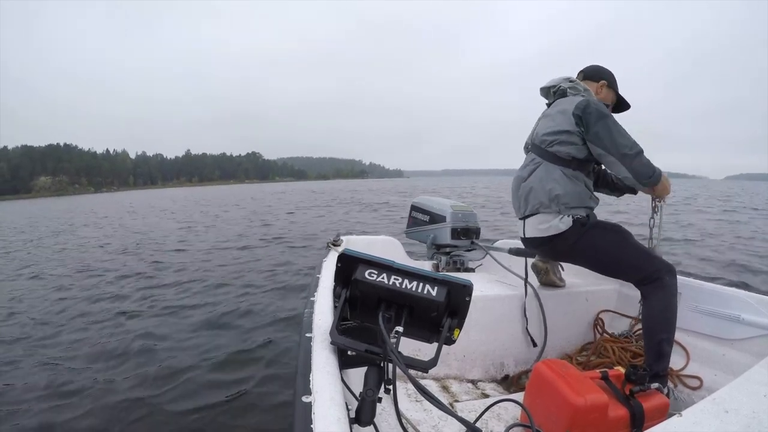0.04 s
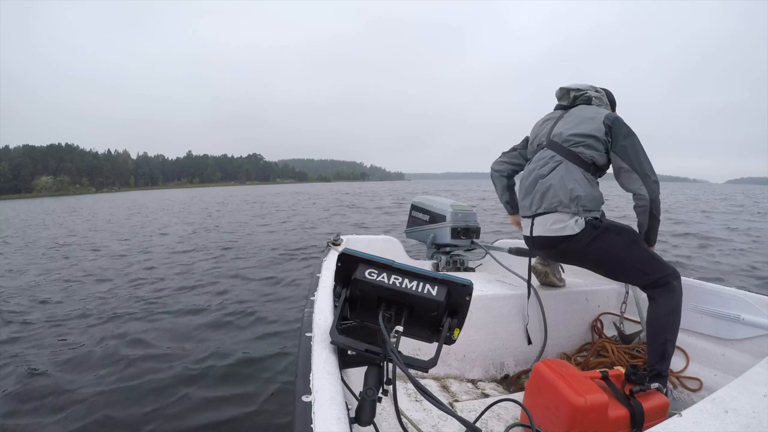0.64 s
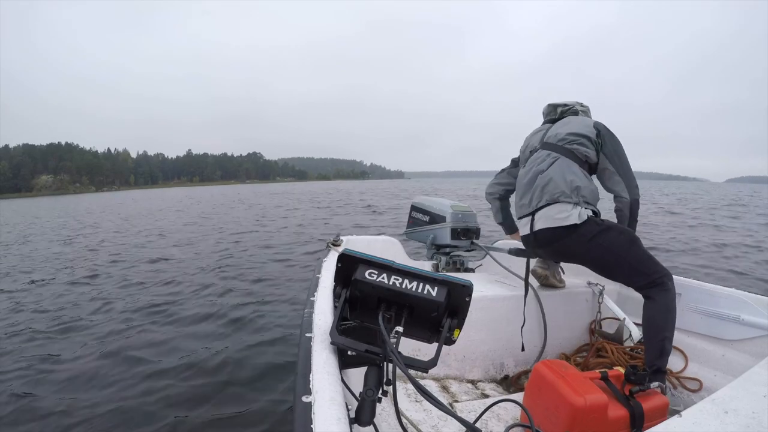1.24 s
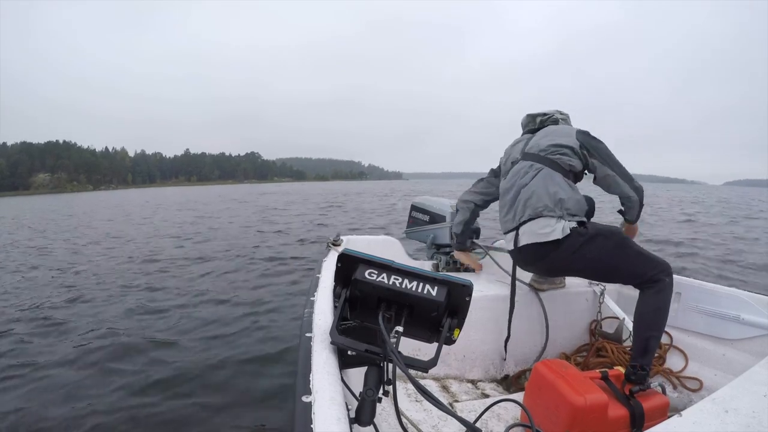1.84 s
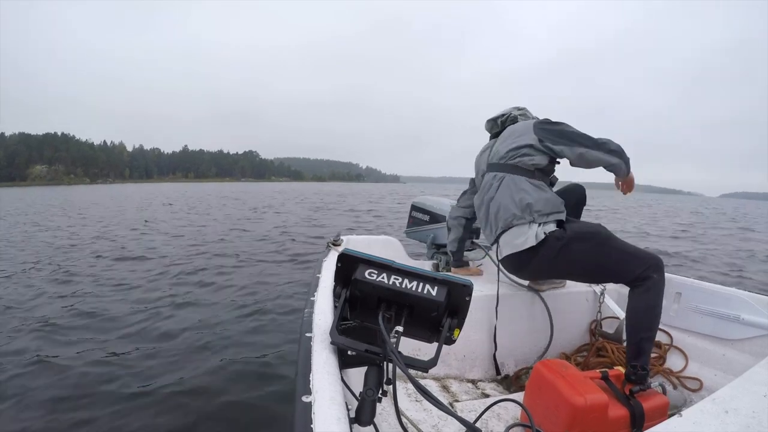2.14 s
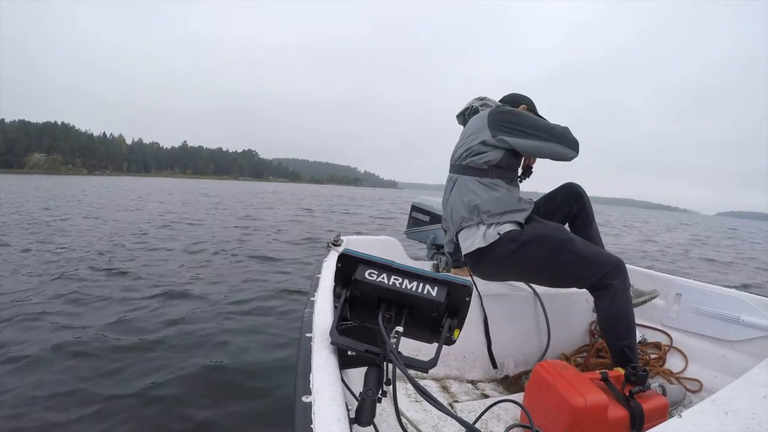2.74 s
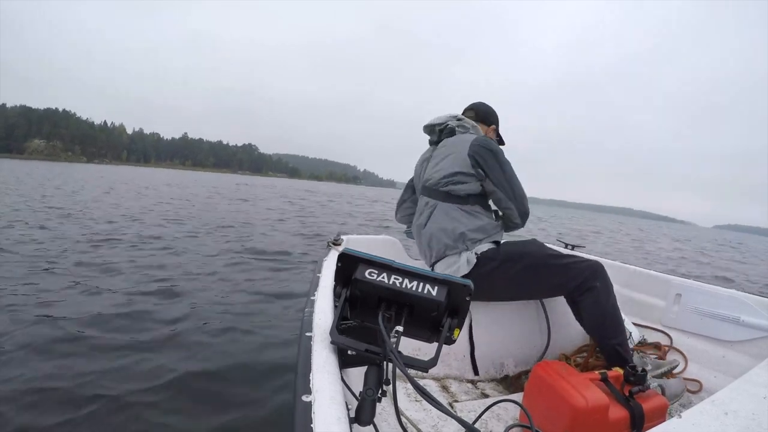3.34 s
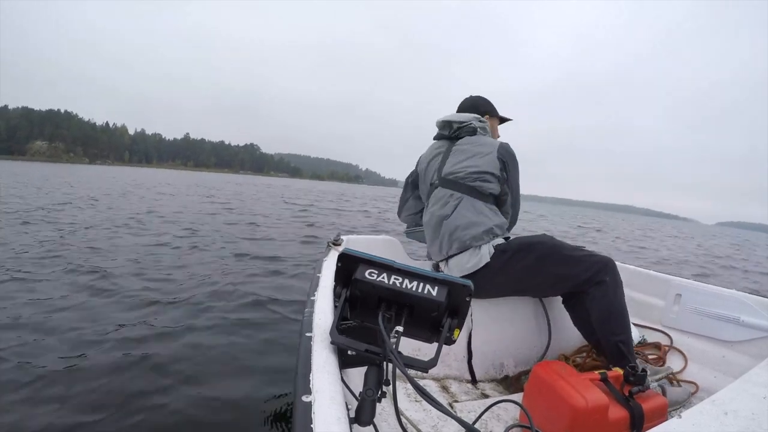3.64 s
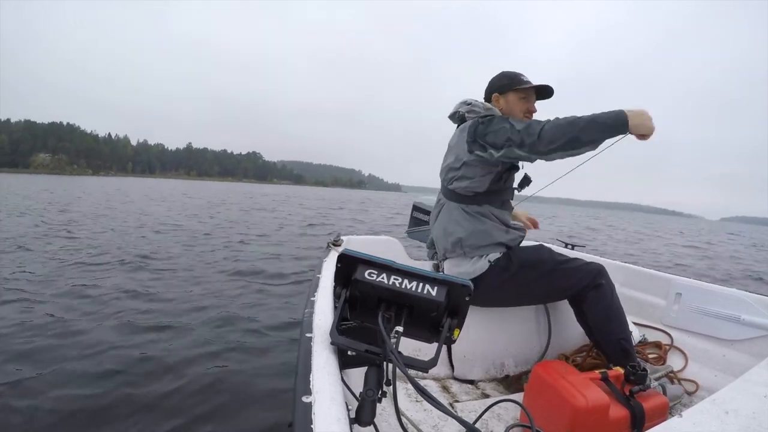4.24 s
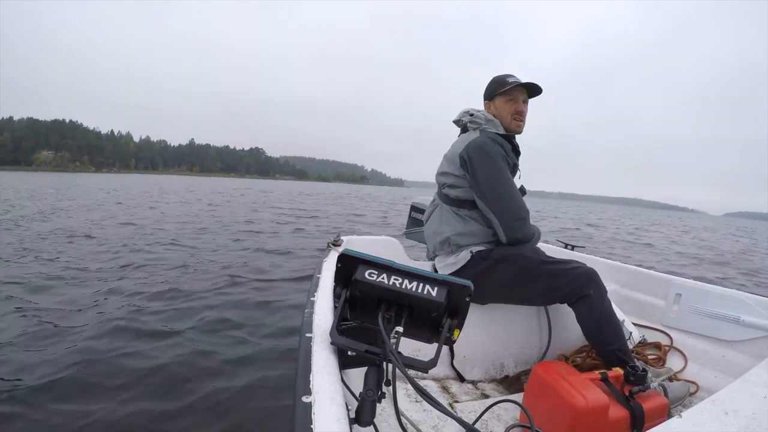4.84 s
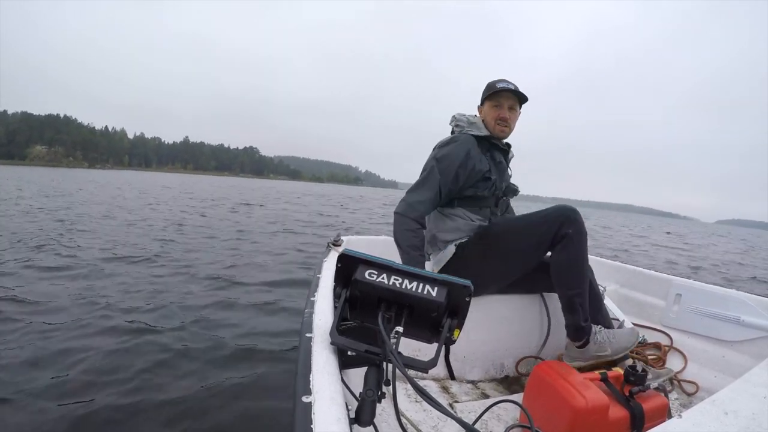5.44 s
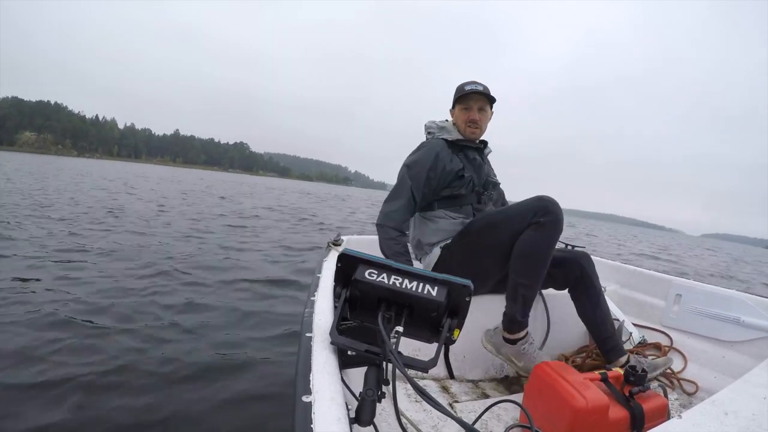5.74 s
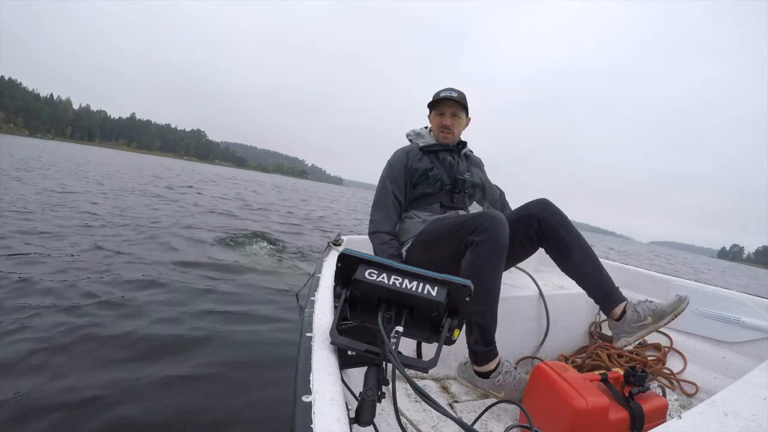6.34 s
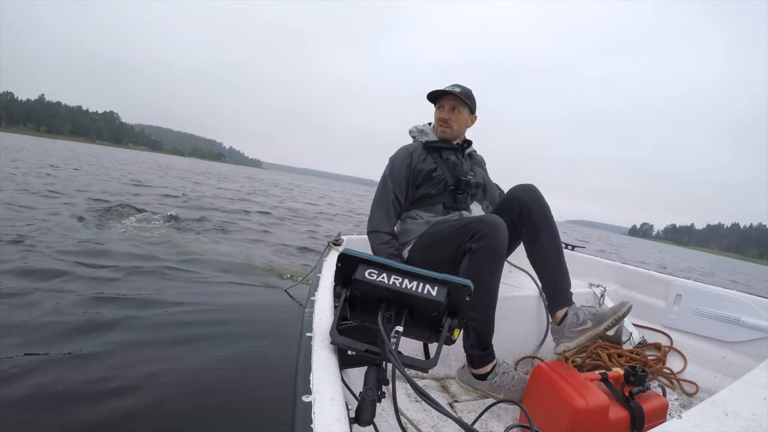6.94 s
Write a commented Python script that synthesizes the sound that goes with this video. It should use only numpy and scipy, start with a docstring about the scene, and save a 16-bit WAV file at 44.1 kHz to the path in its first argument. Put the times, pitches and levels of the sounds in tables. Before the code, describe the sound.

An anchor chain clatters onto a small boat's hull, then an outboard motor is pull-started, sputters and revs to a steady drone.

```python
"""An anchor chain clinks and clatters aboard, close by, and drops on the hull of a small open boat.
The microphone is in the boat, out in the breeze: wind buffets its two ports and water laps outside.
The outboard motor begins to shake the boat, a cord rasps off its spool, and the sputtering idle
revs up to a steady drone over the wash. The low boom sounds wide, in opposite phase left and right;
at the end it fades while a centred drone and whine swell."""
import sys
import numpy as np
from scipy import signal
from scipy.fft import rfft, irfft, next_fast_len
from scipy.io import wavfile
from scipy.ndimage import uniform_filter1d, map_coordinates

SR = 44100
rng = np.random.default_rng(int(sys.argv[2]) if len(sys.argv) > 2 else 0)


def generate_wav(signal):
    """Clip the signal to [-1, 1] and save it as 16-bit WAV at the path in sys.argv[1]."""
    frames = np.transpose(np.atleast_2d(signal))
    scaled = np.clip(frames, -1, 1) * 32767
    pcm = np.round(scaled).astype(np.int16)
    wavfile.write(sys.argv[1], SR, pcm)


N = 309141
TIME = np.arange(N) / SR

# links fall in the boat: (time [s], clink [dB], clatter [dB], long ring [dB])
LINK_FALLS = [(0.002, -39, -19, -25.5), (0.023, -47, -12, -27), (0.07, -48.5, -15.5, -26.5),
              (0.095, -50.5, -26, -53), (0.133, -57.5, -19, -39), (0.156, -52.5, -22.5, -32),
              (0.207, -38.5, -28, -27), (0.231, -39.5, -25.5, -25), (0.275, -38, -19, -22.5),
              (0.29, -31.5, -17, -42), (0.324, -34, -25.5, -23), (0.345, -27.5, -24.5, -30),
              (0.368, -29.5, -20.5, -25), (0.395, -33, -25, -25.5), (0.483, -62, -55, -51),
              (0.502, -50, -49, -37.5), (0.537, -43, -34, -31), (0.65, -56.5, -60, -60),
              (0.825, -52, -52, -46.5), (0.884, -50, -61, -67), (0.923, -40, -35.5, -31),
              (0.96, -56.5, -52, -36), (1.036, -48.5, -35.5, -52), (1.05, -54.5, -42, -29),
              (1.08, -56, -39, -55), (1.105, -52.5, -37.5, -61), (1.127, -34.5, -29, -34),
              (1.158, -34.5, -32, -38), (1.191, -33, -26, -42), (1.226, -55, -55, -32),
              (1.243, -55, -36.5, -61), (1.36, -70, -42.5, -47.5), (1.563, -80, -75, -50),
              (2.493, -90, -73, -59)]
# modes of a link, then of the chain's high, long ring: (pitch [Hz], level [dB], t60 [s])
STEEL_MODES = [(1857, -15.5, 0.13), (2494, -13, 0.044), (2912, -23.5, 0.071), (3626, 4.5, 0.066),
               (4210, -4.5, 0.093), (4410, 4.5, 0.043), (4730, -3, 0.049), (5320, -5, 0.053),
               (5920, -1, 0.081), (6030, -13.5, 0.11), (6580, -0.5, 0.056), (7870, -5, 0.092),
               (8950, -13, 0.19), (9360, -24, 0.086), (10460, -28, 0.57), (12400, -29, .3),
               (13000, -36, 0.27), (13580, -28.5, 0.31), (14840, -26.5, 0.13)]
LONG_RING_MODES = [(8315, -1, 0.19), (8225, -13.5, 0.28), (8020, -15.5, 0.1), (8500, -13, .07),
                   (8980, -9.5, 0.17), (9140, -16, 0.068), (9510, -20.5, 0.071)]
# loose links jingle; the chain drags on the gunwale; links tick: (start [s], end [s], level [dB])
JINGLES = [(0.248, 0.508, -58.5), (0.818, 1.297, -62)]
DRAGS = [(-0.05, 0.21, -32), (0.285, 0.44, -41)]
CHATTERS = [(0.0, 0.18, -41.5), (0.197, 0.427, -39.5), (0.427, 0.57, -56.5), (0.822, 1.097, -56),
            (1.125, 1.212, -40), (1.22, 1.423, -61)]
# the chain knocking on the gunwale, dragging over it, scraping itself: (frequency [Hz], density [dB])
CLATTER_SPECTRUM = [(88, -36), (150, -6.5), (260, 0), (336, -9), (532, -4), (675, -14), (3640, -15),
                    (7050, -33), (8630, -32), (10400, -50), (12000, -70), (15600, -95.5), (22000, -120)]
DRAG_SPECTRUM = [(80, -26), (160, 8), (280, -0.5), (420, -4), (600, -9.5), (1000, -9.5), (2500, -63.5)]
SCRAPE_SPECTRUM = [(700, 8.5), (2000, -4.5), (4200, -5.5), (7000, -8.5), (9500, 0.5), (12000, -26),
                   (15000, -34.5)]
# the gunwale's resonances: (pitch [Hz], width [Hz], level [dB])
GUNWALE_MODES = [(1145, 47, 2), (1684, 64, 3), (2344, 99, 0.5), (2874, 42, -3), (3780, 130, 1.5),
                 (4040, 71, 2.5)]
# the breeze on the microphone: (time [s], level [dB])
BREEZE_LEVEL = [(0, -30.5), (0.5, -30.5), (1.05, -36), (1.55, -41.5), (1.9, -32), (2.35, -36.5),
                (2.85, -28.5), (3.4, -35), (3.75, -37), (3.95, -46.5), (5.8, -63), (6.8, -41)]
# low thuds of wind and of knocks on the hull: (time [s], peak [dB], pitch [Hz])
LOW_THUDS = [(0.12, -26.5, 70), (0.318, -17.5, 85), (0.36, -18, 107), (0.511, -23, 106), (0.577, -22.5, 50),
             (0.685, -24, 48.5), (0.856, -20, 55), (0.978, -34, 52), (1.42, -24, 36), (1.677, -24, 55.4),
             (1.756, -28.5, 79), (1.866, -30, 127), (1.995, -26, 58), (2.195, -29.5, 66),
             (2.545, -30, 70.5), (2.68, -28, 58), (2.73, -28, 134), (2.79, -24, 64.5), (2.86, -31.5, 139),
             (2.94, -27.5, 127), (2.979, -22.5, 42.4), (3.077, -25.5, 59.4)]
# wind on the ports, wash along the hull, faint hiss, lapping water: (frequency [Hz], density [dB])
WIND_SPECTRUM = [(12, -34.5), (20, 0), (53, 1.5), (129, -6.5), (174, -17.5), (313, -28.5), (434, -30),
                 (520, -33), (675, -36), (1000, -53), (1300, -77.5), (2200, -120)]
WASH_SPECTRUM = [(530, -22.5), (900, -2.5), (1150, -10.5), (1260, -4), (1380, -8), (2030, -7.5),
                 (2740, -11), (4100, -15), (9690, -30.5), (12300, -58), (14000, -74.5)]
HISS_SPECTRUM = [(590, -38), (1000, -2), (2010, -7.5), (2380, -6.5), (3480, -13), (4080, -9.5),
                 (5010, -11.5), (9510, -10.5), (13200, -22.5), (15400, -32)]
LAP_SPECTRUM = [(100, -0.5), (300, -4), (600, -13), (1100, -24.5), (2500, -55.5)]
# light knocks in the boat and ticks of the idling motor: (time [s], level [dB], pitch [Hz])
KNOCKS_AND_TICKS = [(0.006, -22, 288), (0.028, -27, 1130), (0.034, -25.5, 3500), (0.075, -34, 1130),
                    (0.075, -21.5, 3750), (0.11, -28, 190), (0.146, -27.5, 2330), (0.162, -30, 527),
                    (0.296, -27.5, 1090), (0.748, -39.5, 1040), (0.750, -41, 3600), (1.184, -25, 680),
                    (1.19, -22.5, 292), (1.265, -38, 1850), (1.766, -42.5, 1020), (1.901, -41, 1710),
                    (2.274, -47.5, 530), (2.288, -48, 5540), (2.243, -62, 694), (2.403, -43.5, 476),
                    (2.62, -41, 660), (2.626, -35, 457), (2.654, -47.5, 3700), (2.88, -50, 2260),
                    (3.34, -50.5, 860), (3.604, -46.5, 8400), (4.875, -60, 1920), (4.94, -56, 1810),
                    (4.971, -54.5, 5380), (4.997, -54, 1840), (5.027, -54.5, 2170), (5.933, -64, 8240),
                    (6.013, -49.5, 5010), (6.219, -53.5, 5560)]
# jolts through the hull: (time [s], relative level [dB], pitch [Hz])
HULL_JOLTS = [(3.185, -25.5, 131.6), (3.34, -37, 470), (3.585, -36, 480), (3.592, -24, 267),
              (3.835, -21, 286), (3.838, -25.5, 458), (3.90, -18.5, 227), (3.91, -28.5, 400),
              (4.14, -30.5, 647), (5.12, -36.5, 436), (5.56, -26, 258), (4.16, -16.5, 238),
              (4.445, -24, 285), (4.57, -26.5, 520), (4.85, -42, 845), (4.97, -41, 494),
              (5.173, -37.5, 510), (5.235, -32, 514), (5.29, -26, 271), (5.335, -21.5, 279),
              (5.408, -23, 235), (5.975, -50, 800)]
# a link swings free and one mode sings out: (time [s], pitch [Hz], level [dB])
PINGS = [(0.232, 4740, -19.5), (0.226, 4470, -26.5), (0.279, 4450, -26), (0.318, 3570, -29),
         (0.326, 6600, -28), (0.346, 3623, -18.5), (0.346, 6580, -17), (0.372, 4740, -29.5),
         (0.383, 1900, -30), (0.396, 3680, -30), (0.385, 10200, -35), (0.396, 12480, -48),
         (0.396, 13100, -50), (0.504, 5850, -43), (0.537, 3730, -34), (0.539, 5880, -31.5),
         (0.538, 6660, -44), (0.65, 5895, -40.5), (0.923, 3650, -33.5), (0.921, 4748, -33),
         (0.922, 6800, -39), (0.923, 9600, -44), (0.923, 12400, -41), (0.923, 14930, -46),
         (1.079, 4670, -36), (1.128, 3690, -25), (1.128, 5160, -32), (1.128, 12930, -46),
         (1.161, 5250, -33), (1.16, 7880, -34), (1.192, 6100, -34), (1.192, 6440, -39), (1.105, 3630, -39),
         (1.192, 3695, -29), (1.27, 4150, -45), (1.33, 4150, -54)]
# weights land in the boat: (time [s], relative level [dB])
THUMPS = [(0.293, -11), (0.345, -25), (0.439, -24), (1.183, -10.5), (1.226, -46)]
# a blow on the hull: (frequency [Hz], density [dB])
THUD_SPECTRUM = [(40, -18), (90, -8.5), (140, 10.5), (220, -12.5), (330, -16), (550, -5.5), (850, -17),
                 (1400, -40.5), (4000, -43), (9000, -65)]
# how long that blow rings: (frequency [Hz], t60 [s])
THUD_DECAY = [(100, 0.35), (250, 0.34), (600, 0.14), (1200, 0.012), (5000, 0.0696)]
# cloth brushing: (frequency [Hz], density [dB])
CLOTH_SPECTRUM = [(800, -26), (2000, 1), (5000, -7), (8000, -9), (12000, -26.5)]
# the idle hunts, then the throttle opens: (time [s], cycle rate [Hz])
MOTOR_SPEED = [(3.3, 31), (3.65, 34), (4.3, 32.5), (4.85, 36.2), (5.1, 35), (5.3, 31), (5.42, 29.8),
               (5.55, 32), (5.714, 35.9), (5.892, 40.3), (6.09, 43.6), (6.356, 47), (6.74, 49.5),
               (6.9, 50.2), (7, 49.8)]
# the hull's boom: (time [s], relative level [dB])
BOOM_LEVEL = [(3.3, -38.5), (3.5, -24.5), (3.66, -16), (3.77, -31), (3.89, -17), (4.0, -30), (4.14, -20),
              (4.4, -18), (4.83, -16.5), (5.0, -20.5), (5.3, -17.5), (5.45, -17.5), (5.65, -16.5),
              (5.86, -24), (6.05, -21)]
# the idle stumbles: (time [s], change in the boom [dB])
STUMBLES = [(3.6, -8), (4.07, 4), (4.28, -5), (4.422, -10), (4.561, -9), (4.68, -0.5), (4.921, -3),
            (5.09, -3.5), (5.19, -2)]
# low and higher hull resonances: (pitch [Hz], width [Hz], left [dB], right [dB])
BOOM_MODES = [(65, 55, -21, -20), (130.8, 35.6, -7, 1.5), (202.4, 31.6, -9, -12), (253, 63.5, -11.5, -18)]
GROWL_MODES = [(380, 203, -5.5, -12.5), (458, 63, 1, 6.5), (514.6, 67, -16, 3.5), (635, 120, -15, -11.5),
               (724, 84, -6.5, -8.5)]
# low and high vibration at the bracket, exhaust, gears: (multiple [of the cycle rate], level [dB])
LOW_ORDERS = [(1, 2), (2, 5.5), (3, -18), (4, 2), (5, -7.5), (6, -2), (7, -15), (8, -16)]
HIGH_ORDERS = [(8, 4), (9, -11.5), (10, -1.5), (11, -4.5), (12, -3.5), (13, 2), (14, 0), (15, -2.5),
               (16, -4.5), (17, -15), (18, 0.5), (20, -2.5)]
EXHAUST_ORDERS = [(2, 2.5), (3, -21), (4, -13), (6, -23), (8, -28.5)]
GEAR_ORDERS = [(9, -2.5), (10, 0.5), (11, -7.5), (12, -14), (14, 3.5), (16, -6.5), (18, -6.5), (20, -11.5),
               (24, -16), (26, -9), (32, -12), (40, -11), (42, -14)]
# low rumbles, the last a throb of the revving motor: (start [s], end [s], level [dB])
RUMBLES = [(3.56, 3.847, -26.5), (4.126, 4.495, -25.5), (6.062, 6.385, -34)]
# the low rumble, then the running cord: (frequency [Hz], density [dB])
RUMBLE_SPECTRUM = [(15, -3.5), (40, 4.5), (65, 21.5), (95, -13.5), (200, -57)]
CORD_SPECTRUM = [(530, -44), (900, -23), (1020, -11.5), (1340, 5.5), (1660, -9), (2080, -0.5), (3170, -2.5),
                 (4160, -3.5), (7500, -6.5), (8200, -16), (13200, -32.5), (14200, -60)]
# pulls on the cord: (time [s], length [s], level [dB], spool ring relative to that level [dB])
STROKES = [(3.826, 0.011, -40.5, -7.5), (3.9, 0.088, -57.5, -9), (4.137, 0.037, -35, -1),
           (4.228, 0.04, -46, -7), (4.323, 0.016, -45.5, -7.5), (4.403, 0.02, -43.5, -3.5),
           (4.465, 0.019, -47.5, -3.5), (4.539, 0.046, -44.5, -5.5), (4.576, 0.11, -48, -0.5),
           (4.692, 0.028, -46.5, -1.5), (4.736, 0.02, -42.5, -6.5), (4.76, 0.042, -42, 3.5)]
# the taut cord sings: (time [s], length [s], first pitch [Hz], last pitch [Hz], level [dB])
SQUEAKS = [(3.831, 0.013, 5450, 5230, -43), (4.143, 0.021, 6350, 6550, -37), (4.15, 0.02, 7000, 7450, -38),
           (4.232, 0.036, 5400, 5280, -50), (4.242, 0.054, 2780, 2500, -56),
           (4.592, 0.051, 2480, 2550, -60)]
# resonances of the cord's spool and the motor's cowling: (pitch [Hz], width [Hz], level [dB])
SPOOL_MODES = [(1630, 37, 3), (2074, 45, 11), (2520, 33, 3.5), (3140, 92, 6.5), (4840, 90, -3.5),
               (5270, 90, -5), (6500, 85, -5.5), (7070, 62, -3), (7140, 70, 2.5), (8700, 160, -13)]
COWLING_MODES = [(1330, 52, 8), (1670, 100, 2.5), (2100, 100, -1), (2400, 120, 7), (3190, 130, 0),
                 (3900, 750, -6)]
# the motor's bracket turns: (time [s], pitch [Hz], relative level [dB])
GROAN = [(3.83, 272.6, -25), (3.854, 243.4, -28.5), (3.88, 251.3, -39), (3.916, 252.6, -27.5),
         (3.946, 278, -32), (3.998, 250.3, -24.5), (4.1, 262, -38.5)]
# hull resonances met while revving:
# (multiple [of the cycle rate], pitch [Hz], width [Hz], left [dB], right [dB])
SURGES = [(1, 45.7, 2.9, -29, -28.5), (2, 100, 12, -29, -27.5), (3, 124, 4.8, -33.5, -18.5),
          (3, 160, 4.4, -31, -21), (4, 147.4, 7.6, -26.5, -20), (4, 176.1, 20, -18, -29),
          (6, 219, 18, -21.5, -27.5), (6, 265.5, 22, -25.5, -39.5), (8, 260, 8.3, -24, -38),
          (8, 293, 19.5, -27.5, -40.5), (8, 350, 26, -34.5, -44), (10, 440, 23, -44.5, -33.5),
          (13, 526, 31, -47, -31), (13, 450, 24, -49.5, -41), (14, 670, 22, -46.5, -60.5),
          (18, 700, 62, -57.5, -47.5)]

CROSSOVER_S, CROSSOVER_LENGTH_S = 6.124, 0.75  # the wide boom fades, a centred drone and whine swell
TOP_HZ = 15350  # the microphone's band limit


def amp(db):
    """Decibels to gain."""
    return 10 ** (np.asarray(db) / 20)


def unit(x):
    """Scale to rms 1."""
    return x / np.sqrt(np.mean(x ** 2) + 1e-20)


def even(x):
    """Hold a stereo sound at rms 1 over about 60 ms."""
    power = uniform_filter1d(np.mean(x ** 2, 0), size=2600)
    return x / np.sqrt(np.abs(power) + 1e-12)


def along(points, hz):
    """Read (frequency, value) points on a log axis."""
    f, v = np.transpose(points)
    return np.interp(np.log(hz + 1), np.log(f + 1), v)


def curves(rows):
    """One value per sample for each column after the time."""
    s, *columns = np.transpose(rows)
    return [np.interp(TIME, s, column) for column in columns]


def during(start, end, fade):
    """A gate whose sloping edges are centred on two times."""
    return np.clip(np.minimum(TIME - start, end - TIME) / fade + .5, 0, 1)


def spans(rows, fade):
    """A gain curve from (start, end, level) rows."""
    return sum(amp(db) * during(start, end, fade) for start, end, db in rows)


def ramp(start, length):
    """Rises evenly from 0 to 1."""
    return np.clip((TIME - start) / length, 0, 1)


def wobble(rate):
    """A smooth random curve, rate knots a second."""
    grid = np.arange(0, N * rate / SR + 1, 1 / 8)
    knots = rng.standard_normal(int(grid[-1]) + 4)
    return np.interp(TIME * rate, grid, map_coordinates(knots, [grid]))


def filtered(x, response):
    """Pass x through a complex response of frequency."""
    n = x.shape[-1]
    m = next_fast_len(n + 8192)
    return irfft(rfft(x, m) * response(np.fft.rfftfreq(m, 1 / SR)), m)[..., :n]


def resonance(f, hz, width):
    """Causal response of one mode."""
    return 1j * f * width / (hz * hz - f * f + 1j * f * width)


def shell(f, modes):
    """Response of a body whose modes alternate in sign."""
    return sum((-1) ** k * amp(db) * resonance(f, hz, width) for k, (hz, width, db) in enumerate(modes))


def noise(spectrum, size=N):
    """Coloured noise of rms 1."""
    return unit(filtered(rng.standard_normal(size), lambda f: amp(along(spectrum, f))))


def spread(spectrum, side_db):
    """Coloured noise with a part that differs between left and right."""
    mid, side = noise(spectrum), amp(side_db) * noise(spectrum)
    return np.array([mid + side, mid - side])


def opposed(left_db, right_db):
    """Gains for a wide sound, in opposite phase left and right."""
    return np.array([[amp(left_db)], [-amp(right_db)]])


def contacts(per_second, spread_db, size=N):
    """Tiny impacts at random times and of random size."""
    hits = rng.random(size) < per_second / SR
    strength = amp(spread_db * np.clip(rng.standard_normal(size), -2, 2))
    return hits * strength * rng.choice([-1, 1], size)


def add(track, s, sound):
    """Mix a sound into a track at time s."""
    part = track[max(0, round(s * SR)):][:len(sound)]
    part += sound[:len(part)]


def link_ring(modes, t, scatter_db):
    """One contact rings every mode of a link at a new strength."""
    hz, db, t60 = np.transpose(modes)[:, :, None]
    detune, offset, strength = rng.standard_normal((3, len(modes), 1))
    phase = 2 * np.pi * (hz * (1 + 0.0017 * detune) * t + offset)  # no two links are quite alike
    return np.sum(amp(db + scatter_db * strength - 60 * t / t60) * np.sin(phase), 0)


def clatter(t, t60=0.078):
    """A quick run of contacts knocks on the gunwale and rings it."""
    def gunwale(f):
        modes = sum(amp(db) * resonance(f, hz, width) for hz, width, db in GUNWALE_MODES)
        return amp(along(CLATTER_SPECTRUM, f)) * (1 + modes)

    run = unit(filtered(contacts(per_second=1700, spread_db=3, size=len(t)), gunwale))
    return amp(-60 * t / t60) * (1 - np.exp(-t / 0.0057)) * run


def chain(crack_t60=0.0089, jingle_gap_s=0.034):
    """Steel links crack and ring as they fall; loose ones scrape, jingle and drag over the gunwale."""
    out, t = np.zeros(N), np.arange(SR // 5) / SR
    rise = 1 - np.exp(-t / 0.00048)
    for s, db, clatter_db, ring_db in LINK_FALLS:
        pitch = rng.normal(1, 0.033)
        graze, contact, rebound = (-0.0035, -8.5), (0, -3), (rng.uniform(0.0054, 0.013), -5)
        for late_s, softer_db in (graze, contact, rebound):
            crack = amp(-2 - 60 * t / crack_t60) * rng.standard_normal(len(t)) / 2
            clink = link_ring(STEEL_MODES, t * pitch, scatter_db=3)
            add(out, s + late_s, amp(db + softer_db) * rise * (clink + crack))
        add(out, s, amp(ring_db) * rise * link_ring(LONG_RING_MODES, t, scatter_db=-1.5))
        add(out, s, amp(clatter_db) * clatter(t))
    scrape = noise(SCRAPE_SPECTRUM) * amp(1.354 * wobble(55))
    for start, end, db in JINGLES:
        out += amp(db + 11) * during(start, end, fade=0.76) * scrape
        for s in np.arange(start, end, jingle_gap_s):
            clink = link_ring(STEEL_MODES, t * rng.normal(1, 0.16), scatter_db=7)
            long_ring = amp(13) * link_ring(LONG_RING_MODES, t, scatter_db=2.5)
            onset = s + jingle_gap_s * rng.uniform(-0.59, 1.0)
            add(out, onset, amp(db + rng.normal(0, 2.5)) * rise * (clink + long_ring))
    return out + spans(DRAGS, fade=0.027) * noise(DRAG_SPECTRUM)


def chatter(width_share=0.025, dull_above_hz=3840):
    """Dense tiny ticks of link on link; pressed together, the steel rings only briefly."""
    def damped_steel(f):
        modes = sum((-1) ** k * resonance(f, hz, width_share * hz) / (1 + (hz / dull_above_hz) ** 3)
                    for k, (hz, _, _) in enumerate(STEEL_MODES))
        return modes / (1 + 1j * f / 5500) ** 4

    ticks = contacts(per_second=300, spread_db=8.5)
    return spans(CHATTERS, fade=0.016) * unit(filtered(ticks, damped_steel))


def wind_and_thuds(thud_half_width_s=0.019):
    """The breeze on the microphone, with low thuds of wind and of knocks on the hull."""
    breeze = amp(curves(BREEZE_LEVEL)[0] + 1.7 * wobble(15))
    thuds = np.zeros(N)
    for s, db, hz in LOW_THUDS:
        swell = np.exp(-((TIME - s) / thud_half_width_s) ** 2)
        thuds += amp(db) * swell * np.sin(2 * np.pi * (hz * (TIME - s) + rng.random()))
    return breeze * even(spread(WIND_SPECTRUM, side_db=0)) + thuds


def water(crossover):
    """Water laps and washes along the hull, under a faint hiss that sinks as the boom sets in."""
    stirred = during(4.04, 8, fade=0.096)  # by the propeller
    wash_db = -68.5 + 5.5 * stirred + 9.5 * crossover ** 2
    wash = amp(wash_db + 1.1 * wobble(60)) * spread(WASH_SPECTRUM, side_db=-28)
    hiss_db = -66 - 28 * during(3.9, 8, fade=0.16) + 2.5 * crossover
    hiss = amp(hiss_db) * spread(HISS_SPECTRUM, side_db=-9.5)
    lapping = amp(-50.5 + 0.51 * wobble(9.8)) * spread(LAP_SPECTRUM, side_db=2.5)
    return wash + hiss + lapping


def knocks(rows, width_share, t60_at_1khz=0.099):
    """Damped knocks and ticks, each in a band around its pitch; the higher, the shorter."""
    out, t = np.zeros(N), np.arange(SR // 3) / SR
    for s, db, hz in rows:
        t60 = t60_at_1khz * (hz / 1000) ** -0.67
        band = filtered(rng.standard_normal(len(t)), lambda f: resonance(f, hz, width_share * hz) ** 2)
        add(out, s, amp(db - 60 * t / t60) * (1 - np.exp(-t / 0.002)) * unit(band))
    return out


def pings(t60=0.086):
    """Free links ring out clearly, each at its own pitch."""
    out, t = np.zeros(N), np.arange(SR // 4) / SR
    rise = 1 - np.exp(-t / 0.00075)
    for s, hz, db in PINGS:
        add(out, s, amp(db - 60 * t / t60) * rise * np.sin(2 * np.pi * hz * t))
    return out


def thumps():
    """Weights land on the hull; the bass of each blow outlasts its treble."""
    out = np.zeros(N)
    for s, db in THUMPS:
        hz, t, bands = signal.stft(noise(THUD_SPECTRUM, size=SR // 2), SR, nperseg=256)
        decay = amp(-60 * t / along(THUD_DECAY, hz)[:, None])
        _, thud = signal.istft(bands * decay, SR, nperseg=256)
        rise = 1 - np.exp(-TIME[:len(thud)] / 0.00059)
        add(out, s, amp(db - 18.5) * unit(thud * rise))
    return out


def sleeve():
    """A sleeve brushes past the microphone as the arm swings."""
    cloth = noise(CLOTH_SPECTRUM)
    return amp(-60.5 + 2.7 * wobble(120)) * during(2.41, 2.49, fade=0.047) * cloth


def orders(table, shaft, flutter_db):
    """Tones at multiples of the shaft's rate, each fluttering in level."""
    return unit(sum(amp(db + flutter_db * wobble(11)) * np.sin(k * shaft + rng.uniform(0, 2 * np.pi))
                    for k, db in table))


def hull(shaft, table, modes, churn_share):
    """Motor tones and pulsing churn drive the hull's modes; it sounds wide, in opposite phase."""
    share = np.clip(churn_share, 0, 1)
    pushes = 1 + 0.69 * np.cos(2 * shaft)  # two a cycle
    churn = 12.5 * pushes * rng.standard_normal(N)
    drive = np.sqrt(1 - share) * orders(table, shaft, flutter_db=4) + np.sqrt(share) * churn
    return even(filtered(drive, lambda f: sum(resonance(f, hz, width) ** 2 * opposed(left, right)
                                              for hz, width, left, right in modes)))


def boom_and_growl(shaft, rough, crossover, stumble_half_width_s=0.024):
    """The motor shakes the hull: a wide boom, then a growl, sputtering at idle and fading at the end."""
    stumble_db = sum(db * np.exp(-((TIME - s) / stumble_half_width_s) ** 2) for s, db in STUMBLES)
    boom_db = curves(BOOM_LEVEL)[0] - 12.5 * crossover + stumble_db + 10 * rough * wobble(49)
    boom = amp(boom_db) * hull(shaft, LOW_ORDERS, BOOM_MODES, churn_share=1.15 * rough + 0.45 * crossover)
    growl_db = -36 - 15 * crossover + stumble_db / 2 + 15 * rough * wobble(22)
    growl = amp(growl_db) * hull(shaft, HIGH_ORDERS, GROWL_MODES, churn_share=2.3 * rough)
    return boom * during(3.36, 8, fade=0.22) + growl * during(4.1, 8, fade=0.033)


def motor(crossover, smooth_idle_hz=35.7):
    """The outboard turns unevenly at idle, more so as its speed sags, and steadies under load."""
    cycle_hz, = curves(MOTOR_SPEED)
    load = during(5.36, 8, fade=0.13)
    sag_hz = np.maximum(smooth_idle_hz - cycle_hz, 0)
    rough = 0.04 + (0.04 + 0.056 * sag_hz) * (1 - load)
    shaft = 2 * np.pi * (np.cumsum(cycle_hz) / SR + 0.14 * rough * wobble(20))
    return (boom_and_growl(shaft, rough, crossover) + valves(shaft, load, crossover)
            + buzz(shaft, crossover) + exhaust_and_gears(shaft, crossover)
            + putter(shaft) + load * surges(cycle_hz, shaft))


def rumble():
    """Wide, low rumbles, the last a throb of the revving motor."""
    return spans(RUMBLES, fade=0.05) * noise(RUMBLE_SPECTRUM) * opposed(0, 0)


def stroke(start, length, rise_s=0.016, tail_db_per_s=526):
    """One pull: a quick bite, a hold, and a tail as the cord slows."""
    tail_s = np.maximum(TIME - start - 0.6 * length, 0)
    return ramp(start - rise_s / 2, rise_s) * amp(-tail_db_per_s * tail_s)


def cord():
    """The cord runs out in hissing strokes; its quick slips ring the spool, and pulled taut it sings."""
    slide = amp(-60.5) * during(4.1, 4.835, fade=0.015)  # it keeps moving between strokes
    pull = slide + sum(amp(db) * stroke(s, length) for s, length, db, _ in STROKES)
    spin = sum(amp(db + ring_db) * stroke(s, length) for s, length, db, ring_db in STROKES)
    slips = contacts(per_second=480, spread_db=3)
    rasp = unit(filtered(slips, lambda f: shell(f, SPOOL_MODES)))
    grit = amp(-7) * unit(filtered(slips, lambda f: amp(along(CORD_SPECTRUM, f))))
    hiss = amp(-5.5 + 0.93 * wobble(400)) * spread(CORD_SPECTRUM, side_db=-1)
    out = pull * (hiss + grit) + spin * rasp
    for s, length, from_hz, to_hz, db in SQUEAKS:
        hz = (from_hz + (to_hz - from_hz) * ramp(s, length)) * (1 + 0.022 * wobble(900))
        out += amp(db) * during(s, s + length, fade=0.0057) * np.sin(2 * np.pi * np.cumsum(hz) / SR)
    return out


def bracket():
    """The bracket sticks and slips as the motor is turned: a short low groan."""
    hz, db = curves(GROAN)
    phase = 2 * np.pi * np.cumsum(hz * (1 + 0.016 * wobble(70.5))) / SR
    tone = np.sin(phase) + amp(-26) * np.sin(2 * phase) + amp(-53.5) * np.sin(3 * phase)
    return amp(db + 1.5) * during(3.84, 4.08, fade=0.0076) * tone


def cowling(drive):
    """The thin shell around the motor colours what rattles inside it."""
    return unit(filtered(drive, lambda f: shell(f, COWLING_MODES) / (1 + 1j * f / 5000)))


def valves(shaft, load, crossover):
    """The valves clatter under the cowling once a cycle, more evenly under load."""
    rattle = rng.standard_normal(N)
    swing_db = 5.5 * (2 - 0.7 * load) * np.cos(shaft) + 2.6 * wobble(200) + 4 * (1 - load) * wobble(30)
    level = amp(-67.5 + 0.5 * load + 6 * crossover) * during(4.2, 8, fade=0.243)
    return level * cowling(rattle * amp(swing_db))


def putter(shaft):
    """Each firing of the slow idle ticks in the cowling."""
    firings = np.exp(12 * (np.cos(shaft) - 1)) * amp(1.5 * wobble(30)) * rng.standard_normal(N)
    return amp(-66) * during(4.84, 5.35, fade=0.15) * cowling(firings)


def surges(cycle_hz, shaft):
    """As the motor revs, multiples of its cycle rate swell on passing through hull resonances."""
    out = np.zeros((2, N))
    for k, hz, width, left, right in SURGES:
        swell = np.exp(-(1.19 * (k * cycle_hz - hz) / width) ** 2) * amp(1.2 * wobble(25))
        out += opposed(left, right) * swell * np.sin(round(k) * shaft)
    return out


def buzz(shaft, crossover):
    """Under load, nine light strikes in each cycle set the cowling buzzing."""
    angles = rng.uniform(0, 2 * np.pi, size=9)
    strikes = sum(np.exp(8000 * (np.cos(shaft - angle) - 1)) for angle in angles)
    level = amp(-65.5 - crossover + 1.5 * wobble(60)) * during(5.97, 8, fade=0.37)
    return level * cowling(np.gradient(strikes))


def exhaust_and_gears(shaft, crossover):
    """The exhaust's drone and the gears' whine swell in the centre while the wide boom fades."""
    drone = unit(sum(amp(db + 0.87 * wobble(14)) * np.cos(round(k) * shaft) for k, db in EXHAUST_ORDERS))
    whine = unit(orders(GEAR_ORDERS, shaft, flutter_db=0.5) * (1 + 0.27 * wobble(180)))
    both = amp(-39 + 16.5 * crossover ** 2) * drone + amp(-62 + 18 * crossover) * whine
    return both * during(CROSSOVER_S, 8, fade=0.31)


def scene():
    """From inside the boat: chain, knocks and ticks in the centre; jolts, groan and boom wide."""
    crossover = ramp(CROSSOVER_S, CROSSOVER_LENGTH_S)
    centred = chain() + pings() + chatter() + thumps() + knocks(KNOCKS_AND_TICKS, width_share=0.44)
    jolts = knocks(HULL_JOLTS, width_share=0.2) * opposed(5, -2)
    groan = bracket() * opposed(16, 10)
    boat = centred + jolts + groan + cord() + sleeve() + motor(crossover) + rumble()
    return boat + wind_and_thuds() + water(crossover)


def record(dry):
    """The microphone's image is mono at first and then opens; nothing passes above its band limit."""
    mid = (dry[0] + dry[1]) / 2
    side = (dry[0] - dry[1]) / 2 * ramp(2.747, 0.24)
    return filtered(np.array([mid + side, mid - side]), lambda f: f < TOP_HZ)


dry = scene()
out = record(dry)
generate_wav(out)
```